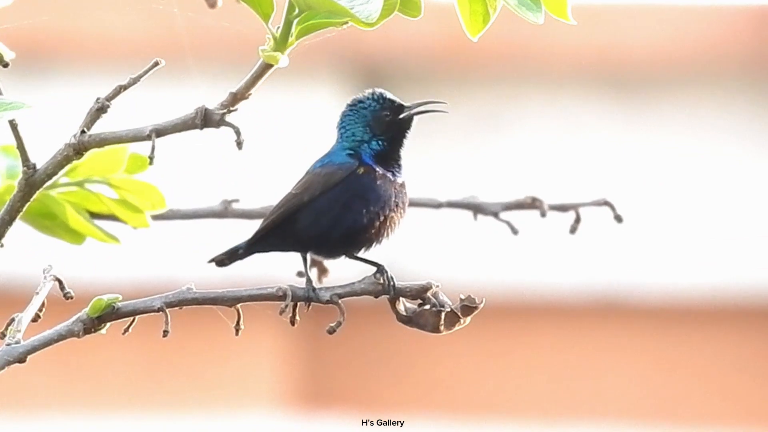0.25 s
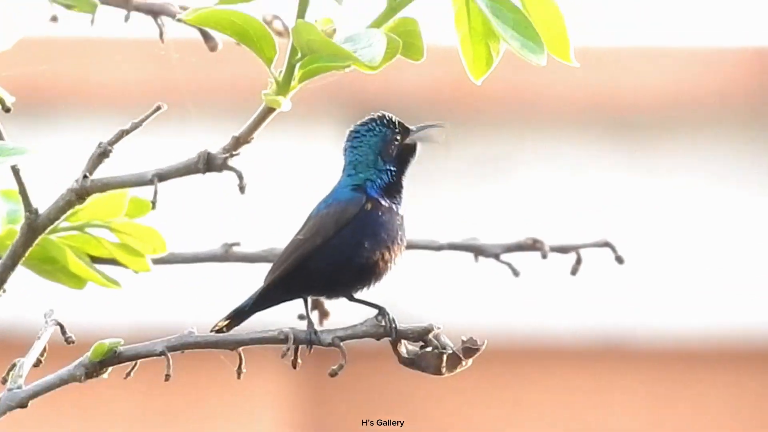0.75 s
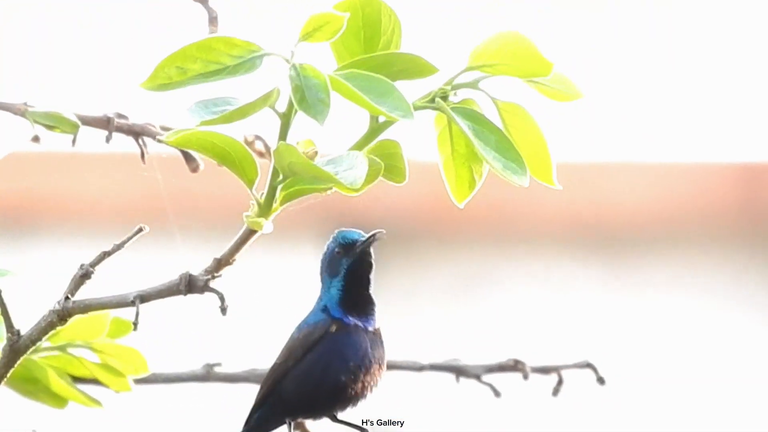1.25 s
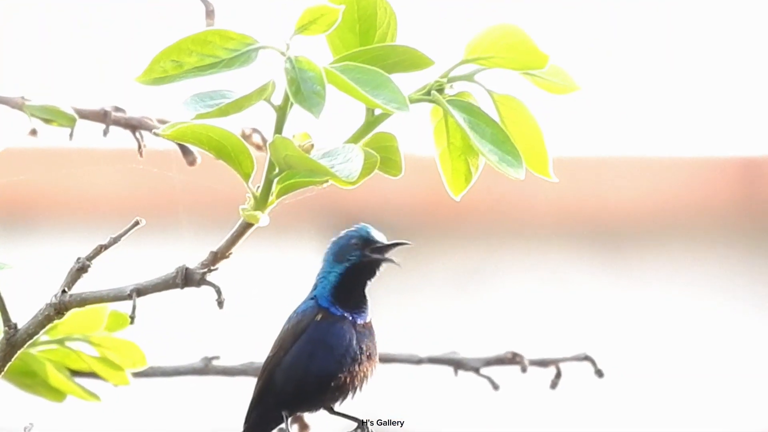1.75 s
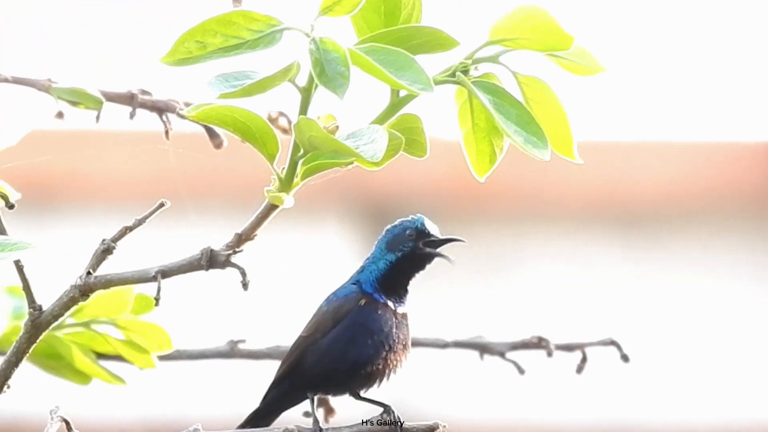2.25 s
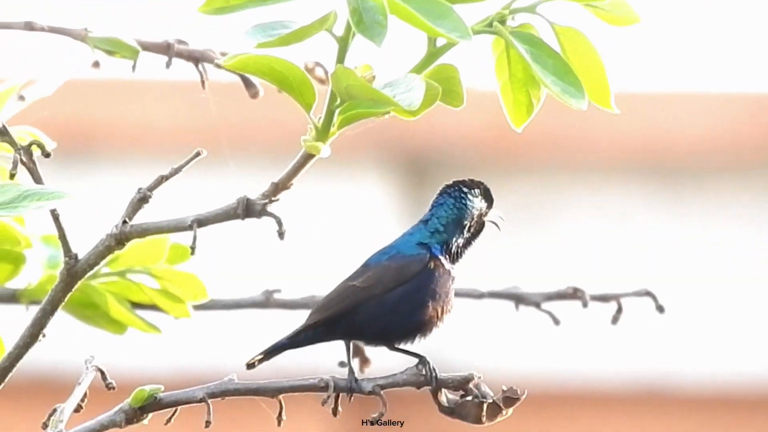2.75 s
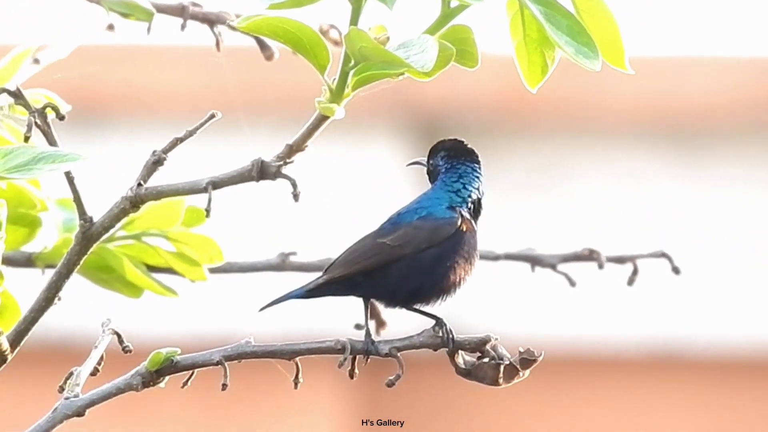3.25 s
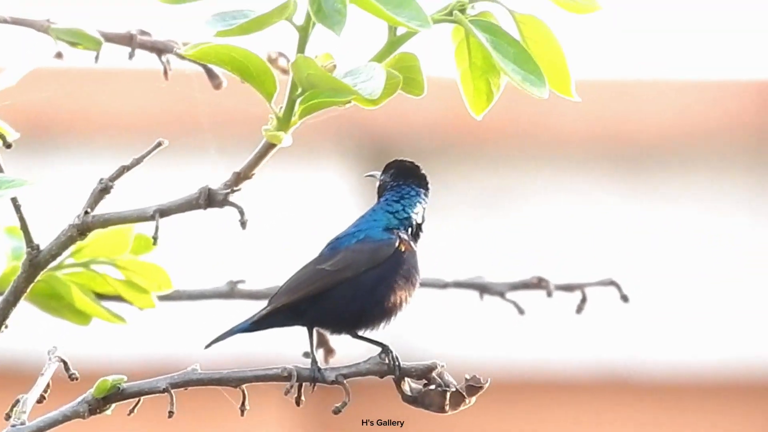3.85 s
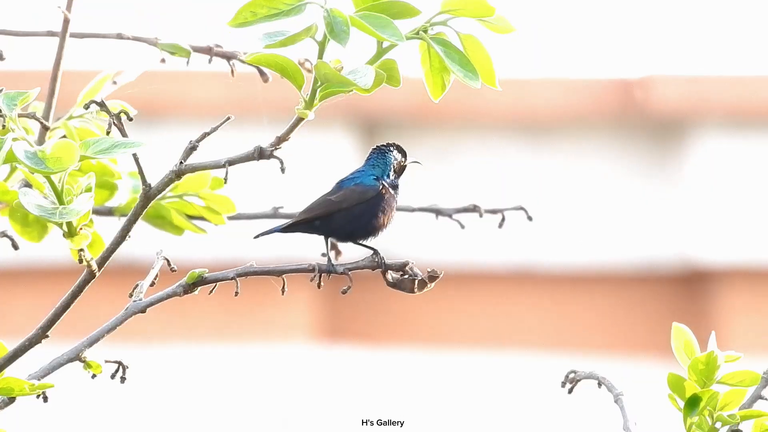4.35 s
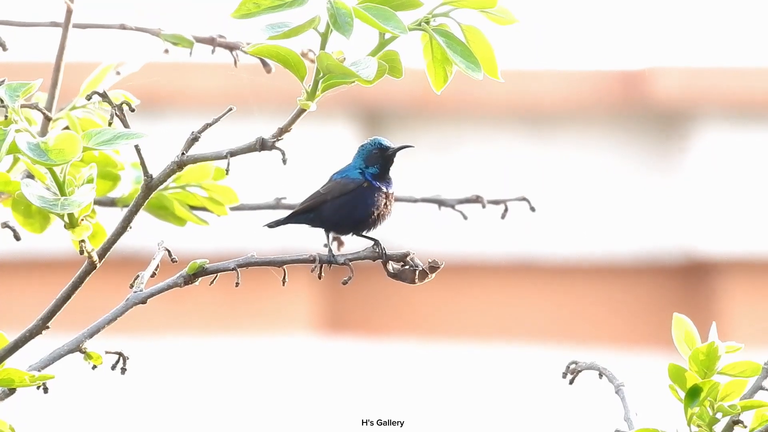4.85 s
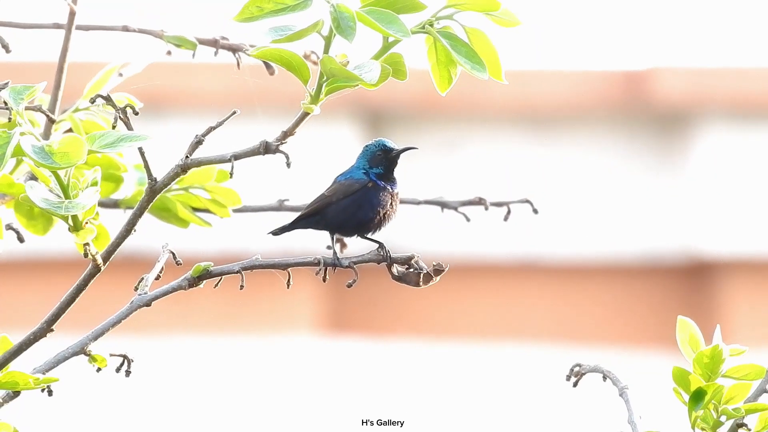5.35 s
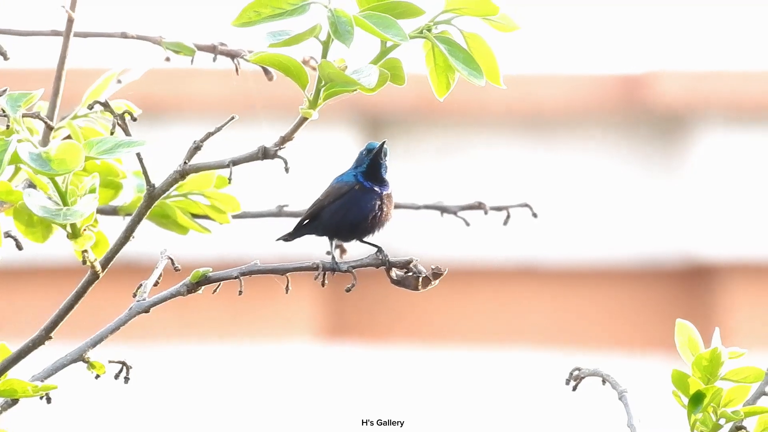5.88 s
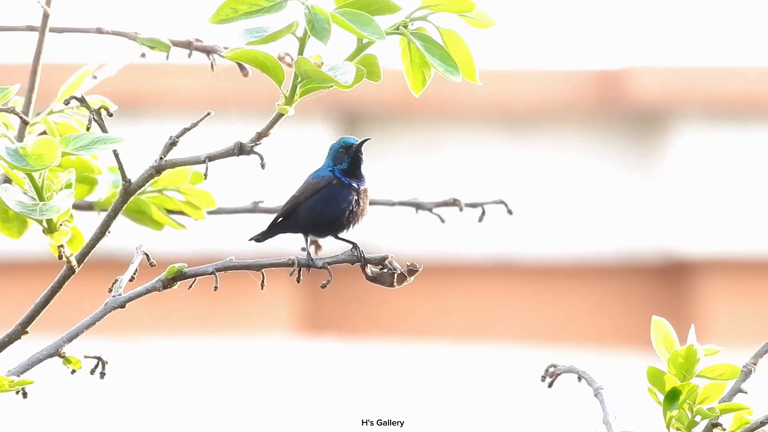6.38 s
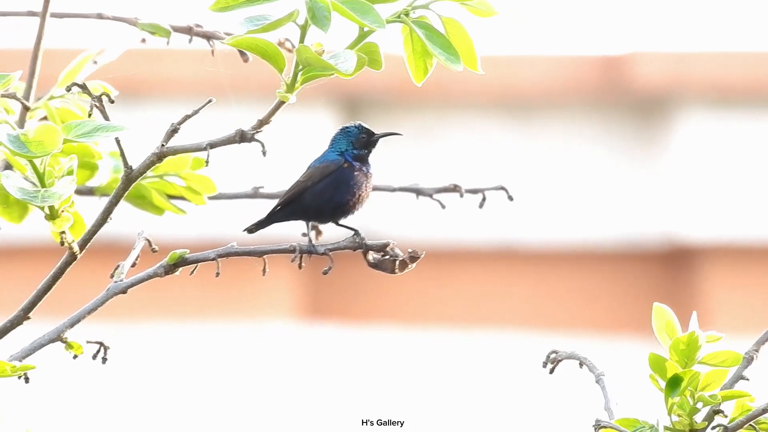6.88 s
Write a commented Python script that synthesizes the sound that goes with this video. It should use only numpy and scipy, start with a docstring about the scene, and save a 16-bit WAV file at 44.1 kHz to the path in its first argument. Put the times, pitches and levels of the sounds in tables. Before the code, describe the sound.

A small sunbird sings two rapid, sharp, high-pitched twittering runs with soft ticks between, echoing off house walls over faint town hum and hiss.

```python
"""In front of a house, over a low town hum and a faint hiss: a sunbird sings two runs with soft high ticks between.
Whistles are gliding sines that turn to noisy warble on fast slides and low notes; rasps are two jittering tones;
ticks are tiny downward slides. Random wall echoes, a diffuse tail and narrow resonances return the song.
Far birds waver in the echoes; hum, traffic and hiss are shaped noise. The level dips briefly once."""
import sys
import numpy as np
from scipy import signal
from scipy.fft import rfft, irfft, next_fast_len
from scipy.io import wavfile
from scipy.ndimage import uniform_filter1d, minimum_filter1d, map_coordinates

SR = 44100
rng = np.random.default_rng(int(sys.argv[2]) if len(sys.argv) > 2 else 0)


def wav_out(sig):
    """Save sig, one row per channel (or a flat mono array), as 16-bit PCM at SR to the path in sys.argv[1]."""
    wavfile.write(sys.argv[1], SR, np.round(np.clip(np.atleast_2d(sig).T, -1, 1) * 32767).astype(np.int16))


N = 313992


def amp(db):
    """Amplitude ratio from dB."""
    return 10 ** (np.asarray(db) / 20)


def unit(x):
    """Scale to rms 1."""
    return x / np.sqrt(np.mean(x ** 2) + 1e-20)


def along(points, hz):
    """Interpolate (Hz, value) points on a log frequency axis."""
    f, v = np.transpose(points)
    return np.interp(np.log(hz + 1), np.log(f + 1), v)


def over_time(points):
    """Interpolate (s, value) points over the whole scene."""
    return np.interp(np.arange(N) / SR, *np.transpose(points))


def wobble(rate_hz, size):
    """Smooth random curve through normal knots, rate_hz knots a second, size samples long."""
    knots = rng.standard_normal(int(size * rate_hz / SR) + 4)
    return map_coordinates(knots, [np.arange(size) * rate_hz / SR])


def filtered(x, response):
    """Multiply the spectrum by a complex response of frequency."""
    m = next_fast_len(N + SR // 2)
    return irfft(rfft(x, m) * response(np.fft.rfftfreq(m, 1 / SR)), m)[..., :N]


def add(track, start_s, sound):
    """Mix a sound into the track from start_s."""
    room = track[max(round(start_s * SR), 0):][:len(sound)]
    room += sound[:len(room)]


def pair(two, hz):
    """Mix two unrelated spectra into the partly alike signals of two close microphones."""
    # left-right correlation: f/Hz, correlation
    likeness = [(60, 0.89), (1000, 0.96), (3000, 0.8), (6000, 0.21), (12000, .4)]
    turn = np.arccos(np.clip(along(likeness, hz), -1, 1)) / 2
    mid, side = two[0] * np.cos(turn), two[1] * np.sin(turn)
    return np.array([mid + side, mid - side])


def rush(spectrum):
    """Stereo Gaussian noise of rms 1, shaped by (Hz, dB) points."""
    hz = np.fft.rfftfreq(N, 1 / SR)
    noise = pair(rfft(rng.standard_normal((2, N))), hz)
    return unit(irfft(noise * amp(along(spectrum, hz)), N))


def background():
    """Three shaped noises: wavering town hum, far traffic that swells a little, slightly wavering hiss."""
    # noise spectra: f/Hz, relative density/dB
    hum_spectrum = [(20, -32.5), (40, -16.5), (62, -1.5), (130, -1.5), (170, -2.5), (250, -16.5),
                    (300, -13), (400, -28.5), (900, -54)]
    traffic_spectrum = [(160, -29), (280, -5), (486, 0.5), (635, 8.5), (748, 7.5), (859, 1), (1090, 6),
                        (1310, 1), (2200, -6), (2860, -55.5), (4840, -120)]
    air_spectrum = [(200, -22), (350, -7.5), (670, -17.5), (1400, -11.5), (2100, -9.5), (3400, -5),
                    (4300, -6), (6200, -5), (7000, -9.5), (8200, -24), (10000, -36.5), (15500, -35)]
    # far traffic: t/s, relative level/dB
    traffic_level = [(0, -48), (1.3, -49.5), (2, -48), (3.35, -49), (3.5, -42.5), (3.8, -45.5), (4, -41.5),
                     (4.15, -47), (5.602, -46), (7.12, -48)]
    hum = amp(-45.5 + 0.79 * wobble(6.5, N)) * rush(hum_spectrum)
    swell = amp(1.5 * wobble(14, N))
    traffic = amp(over_time(traffic_level) - 3.5) * swell * rush(traffic_spectrum)
    hiss = amp(-41.5 + 0.5 * wobble(11, N)) * rush(air_spectrum)
    return hum + traffic + hiss


def syrinx(hz, overtone_db=-56):
    """Nearly pure tone of rms about 1 with a trace of its octave."""
    phase = 2 * np.pi * np.cumsum(hz) / SR
    return np.sqrt(2) * (np.sin(phase) + amp(overtone_db) * np.sin(2 * phase))


def warble(hz, swing, rate_hz, flutter_db):
    """Tone of rms 1 with random jitter of pitch (at rate_hz) and strength (at half of it)."""
    tone = syrinx(hz * (1 + swing * wobble(rate_hz, len(hz))))
    return unit(tone * amp(flutter_db * wobble(rate_hz / 2, len(hz))))


def far_birds(swing=.13):
    """Wavering calls of distant birds, each swelling and fading."""
    # t/s, length/s, mean f/Hz, relative level/dB
    calls = [(.07, 0.087, 2225, -42.5), (1.152, .14, 2730, -44), (1.545, .15, 3400, -38.5),
             (1.821, 0.068, 2950, -34), (1.901, 0.15, 2980, -42.5), (2.05, .07, 3550, -32),
             (2.582, 0.091, 2710, -38.5), (2.776, 0.1, 2480, -39.5), (5.619, 0.18, 2456, -43),
             (5.932, 0.11, 2090, -43.5)]
    out = np.zeros(N)
    for start_s, length_s, hz, db in calls:
        swell = np.hanning(int(length_s * SR)) ** .5
        tone = warble(np.full(len(swell), hz), swing, rate_hz=140, flutter_db=4.5)
        add(out, start_s, amp(db) * swell * tone)
    return out


def gesture(note, fade_s):
    """Turn (s, Hz, dB) points into start time, smoothed pitch and loudness eased in and out."""
    s, hz, db = np.transpose(note)
    s = np.sort(s)
    t = np.arange(s[0] - fade_s / 2, s[-1] + fade_s / 2, 1 / SR)
    to_edge_s = np.minimum(t - t[0], t[-1] - t)
    gate = np.sin(np.pi / 2 * np.clip(to_edge_s / fade_s, 0, 1)) ** 2
    pitch = uniform_filter1d(np.interp(t, s, hz), size=180)
    return t[0], pitch, gate * amp(np.interp(t, s, db))


def throat(x):
    """Throat and bill pass mainly the middle band of a harsh sound."""
    # f/Hz, gain/dB
    colour = [(2500, -9), (3500, 1), (4300, 2), (7000, -2.5), (7700, -5), (8600, -22), (11000, -36.5)]
    return filtered(x, lambda hz: amp(along(colour, hz)))


def rasp(start_s, length_s, from_hz, to_hz, db, swelling):
    """Points of a harsh note that swells and fades while its pitch settles exponentially."""
    onset_db, end_db, settle_share = -16, -6, 0.3
    u = np.linspace(0, 1, num=24)
    peak = np.clip(swelling, .05, .95)
    swell_db = np.interp(u, [0, peak, 1], [onset_db, 0, end_db])
    hz = to_hz + (from_hz - to_hz) * np.exp(-u / settle_share)
    return np.column_stack([start_s + length_s * u, hz, db + swell_db])


def rasps(under_db=-9, under_ratio=.8):
    """Chaotic membranes as jittering tones; the second side of the syrinx adds a lower band."""
    # t/s, length/s, start f/Hz, settling f/Hz, relative peak level/dB, swelling share of length
    harsh_notes = [(0.214, .048, 5700, 5500, -31.5, 0.98), (0.375, .047, 6500, 5420, -32, 0.44),
                   (0.601, .04, 6200, 7220, -29, .9), (0.863, 0.073, 7500, 6100, -14, 0.77),
                   (1.095, 0.091, 7200, 5600, -21.5, 0.11), (1.442, .08, 5600, 6440, -17, 0.37),
                   (1.62, 0.021, 7020, 7450, -15.5, 0.3), (1.646, .043, 6320, 6140, -20.5, 0.43),
                   (1.943, 0.027, 6340, 5900, -13, 0.31), (4.438, .063, 7120, 6154, -17, 0.66),
                   (4.804, 0.07, 7200, 6210, -18.5, 0.96), (5.121, .069, 7150, 5850, -20, .4),
                   (5.412, 0.049, 7150, 5800, -22, 0.27)]
    out = np.zeros(N)
    for row in harsh_notes:
        start_s, hz, loud = gesture(rasp(*row), fade_s=0.014)
        upper = warble(hz, swing=.055, rate_hz=1300, flutter_db=3)
        lower = warble(hz * under_ratio, swing=.05, rate_hz=1200, flutter_db=3)
        add(out, start_s, loud * (upper + amp(under_db) * lower))
    return throat(out)


def rise(start_s, length_s, from_hz, to_hz, db, bend=1, ripple_hz=0, swell_db=0):
    """Points of a whistle that slides between two pitches, rising or falling."""
    u = np.linspace(0, 1, num=24)
    hz = from_hz + (to_hz - from_hz) * u ** bend + ripple_hz * np.sin(2 * np.pi * u)
    return np.column_stack([start_s + length_s * u, hz, db + swell_db * (u - .5)])


def eased_in(note, onset_db=-8, onset_share=0.18):
    """The same note with a soft start that decays over a share of its length."""
    s, hz, db = np.transpose(note)
    u = np.linspace(0, 1, num=len(s))
    return np.column_stack([s, hz, db + onset_db * np.exp(-u / onset_share)])


def arch(start_s, length_s, start_hz, top_hz, end_hz, rising, db, fade_db, roundness=1.6):
    """Points of a chip that shoots up and curves down again."""
    u, crest = np.linspace(0, 1, num=40), np.clip(rising, .01, .99)
    sag = np.interp(u, [0, crest, 1], [1, 0, 1]) ** roundness
    foot_hz = np.where(u < crest, start_hz, end_hz)
    hz = top_hz + (foot_hz - top_hz) * sag
    return np.column_stack([start_s + length_s * u, hz, db + fade_db * u])


def swoop(leap_at_s, low_s, high_s, start_hz, foot_hz, top_hz, low_db, high_db, leap_s):
    """Points of a whistle that starts soft, creeps along a low shelf, leaps and holds its top."""
    shelf_bend, onset_db, onset_s = 1.6, -4, 0.017
    t = np.linspace(-low_s, high_s, num=60)
    shelf = start_hz + (foot_hz - start_hz) * np.clip(1 + t / low_s, 0, 1) ** shelf_bend
    leap = (1 + np.tanh(t / leap_s)) / 2
    hz = shelf + (top_hz - shelf) * leap
    soft_db = onset_db * np.exp(-(t + low_s) / onset_s)
    return np.column_stack([leap_at_s + t, hz, low_db + (high_db - low_db) * leap + soft_db])


def motif(s, db, lead_s, blip_db, sigh_db):
    """Points of a low blip, a two-voiced hook and a sinking sigh."""
    # blip: t/s from its own start, f/Hz, relative level/dB
    blip = [(0.0, 4760, -23), (0.016, 4183, -9.5), (0.024, 3340.0, -14.5)]
    # hook, its second voice from the other side of the syrinx, sigh: t/s from motif, f/Hz, relative level/dB
    hook = [(-0.038, 6780.0, -28), (-0.023, 7240.0, -18.5), (-0.015, 7450.0, -18), (-0.009, 6850.0, -10),
            (0.005, 5040.0, -20), (0.021, 3980.0, -16.5)]
    under_hook = [(-0.032, 4507, -25), (-0.02, 6430, -15.5)]
    sigh = [(0.027, 5670, -15), (0.037, 5516, -17), (0.06, 5330.0, -30)]
    return [np.add(blip, (s - lead_s, 0, blip_db)), np.add(hook, (s, 0, db)),
            np.add(under_hook, (s, 0, db)), np.add(sigh, (s, 0, sigh_db))]


def pure_notes():
    """All whistled notes; the two sides of the syrinx may overlap."""
    # rising whistles: t/s, length/s, start f/Hz, end f/Hz, relative level/dB,
    # bend (<1 early rise, >1 late), S-shaped ripple/Hz, level change/dB
    rising_whistles = [(0.431, 0.114, 3360, 5880, -24, 0.55, 129, 6),
                       (0.616, 0.049, 5200, 6060, -28.0, 0.67, 3, 5),
                       (0.663, 0.104, 3130, 5910, -19.5, 0.85, 251, -7.5),
                       (0.92, 0.103, 3220, 5420, -18, 0.95, 41, -2.5),
                       (1.125, 0.1, 3135, 5360, -16, 1.1, -100.0, -2.5),
                       (1.189, 0.118, 3372, 5468, -9, 1.3, 153.5, -1.5),
                       (1.7, 0.018, 5130, 6630, -16.5, 1.1, 147, 2.5),
                       (2.522, 0.086, 3526, 4746, -12.5, 1.8, 48, -7.5),
                       (2.698, 0.079, 3390, 4307, -12, 0.74, 104.5, -17.5),
                       (2.903, 0.065, 3200, 4216, -12.5, 0.83, -49.5, -10.5),
                       (4.858, 0.04, 3595, 4220.0, -20.5, 2.8, -50.0, -6.0),
                       (4.903, 0.096, 4420, 5770, -12, 1.5, 54.5, -11),
                       (5.161, 0.046, 3290, 4470, -20, 0.65, -50.0, -4)]
    # falling chips: t/s, length/s, start f/Hz, end f/Hz, relative level/dB
    falling_chips = [(1.771, 0.012, 7970, 6500, -10), (1.909, 0.0067, 7520, 7160, -6.5),
                     (2.079, 0.014, 6830, 5730, -12.5), (2.209, 0.016, 6740.0, 5930, -14.5),
                     (2.333, 0.032, 6040, 5130, -18.5), (2.408, 0.018, 8340, 8080, -15.5),
                     (2.517, 0.015, 6640.0, 5290, -12), (2.609, 0.03, 8230, 7600, -15.5),
                     (2.72, 0.028, 6300.0, 5310, -18.5), (2.81, 0.014, 8430, 8350, -19.5),
                     (2.933, 0.018, 6590.0, 5010, -19.5)]
    # swoops: leap t/s, low shelf/s, high shelf/s, start f/Hz, leap foot f/Hz, top f/Hz,
    # low relative level/dB, high relative level/dB, leap time constant/s
    leaping_whistles = [(1.567, 0.071, 0.056, 4904, 4870, 6170, -13, -15, 0.013),
                        (1.796, 0.062, 0.054, 4723, 5390, 6380.0, -12.5, -15.5, 0.014),
                        (2.007, 0.071, 0.029, 4396, 5007, 6920, -12, -13.5, 0.006),
                        (2.146, 0.046, 0.034, 4680, 4720, 6785, -15.0, -11, 0.009),
                        (2.287, 0.033, 0.025, 4220, 4575, 6244, -8, -9.5, 0.0046),
                        (2.441, 0.061, 0.038, 3920, 5170, 6366, -9, -15.0, 0.0045),
                        (5.258, 0.049, 0.054, 4487, 5310, 6200, -13.5, -16, 0.0093),
                        (5.525, 0.062, 0.046, 4744, 5150, 6575, -13.5, -13.5, 0.015),
                        (5.782, 0.059, 0.051, 4836, 5540, 6220, -15, -14.0, 0.014),
                        (6.025, 0.059, 0.024, 3970.0, 4830, 6225, -12.0, -11.0, 0.0036),
                        (6.304, 0.089, 0.04, 3370.0, 4510, 6950, -11.0, -13.5, 0.012),
                        (6.567, 0.092, 0.024, 3313, 4735, 6670, -9.0, -11.5, 0.012),
                        (6.832, 0.09, 0.042, 3284, 4590, 6810, -8.5, -16, 0.012),
                        (7.014, 0.035, 0.046, 4510, 4550, 6720, -8.5, -17.5, 0.011)]
    # arched chips: t/s, length/s, start f/Hz, top f/Hz, end f/Hz, rising share of length,
    # relative level/dB, level change by the end/dB
    arched_chips = [(1.34, 0.039, 6330, 8170, 5400, 0.35, -20.5, 8),
                    (2.61, 0.061, 5600, 6930, 4070, 0.1, -8.5, -11),
                    (2.781, 0.076, 5820, 7070, 3615, 0.17, -9, -11.5),
                    (2.977, 0.054, 5840, 7080, 4570, 0.32, -6, -14.5)]
    # second-run motifs: t/s, hook gain/dB, blip lead/s, blip gain/dB, sigh gain/dB
    motif_times = [(5.706, 2.5, 0.063, 2.5, -1), (5.955, 1.0, 0.07, 4, -0.5), (6.216, 0.5, 0.072, 2.5, 0),
                   (6.472, 1, 0.074, 2, 3), (6.733, -1.5, 0.076, 0.5, 4.5), (6.997, -3.5, 0.077, 1, -1.5)]
    notes = [eased_in(rise(*row)) for row in rising_whistles]
    notes += [rise(*row) for row in falling_chips]
    notes += [swoop(*row) for row in leaping_whistles]
    notes += [arch(*row) for row in arched_chips]
    return notes + [note for row in motif_times for note in motif(*row)]


def whistles():
    """Trembling tones along the gestures, hoarse on fast slides and at the bottom of the range."""
    # strength over the singing range: f/Hz, gain/dB
    voice_range = [(3100.0, -12.5), (3800.0, -15.5), (4250.0, -7.5), (4600.0, -0.5), (6500.0, 0),
                   (7000.0, -5), (7500.0, -11.5), (8400.0, -13.5)]
    hoarse_db, hoarse_growth_db, tremor_db = -14.5, 10.5, 2.5
    clear, hoarse = np.zeros((2, N))
    for note in pure_notes():
        start_s, hz, loud = gesture(note, fade_s=0.0034)
        loud = loud * amp(along(voice_range, hz))
        slide = np.clip(np.abs(np.gradient(hz)) * SR / 60000, 0, 1)  # 1 from 60 kHz/s
        slack = np.clip((4500 - hz) / 600, 0, 1)
        share = np.minimum(amp(hoarse_db + hoarse_growth_db * np.maximum(slide, slack)), .9)
        tremor = unit(amp((tremor_db + 1.5 * slide) * wobble(260, len(hz))))
        clear_tone = warble(hz, swing=.012, rate_hz=400, flutter_db=2)
        hoarse_tone = warble(hz, swing=.065, rate_hz=900, flutter_db=3)
        add(clear, start_s, loud * tremor * np.sqrt(1 - share ** 2) * clear_tone)
        add(hoarse, start_s, loud * share * hoarse_tone)
    return clear + throat(hoarse)


def ticks(centre_hz=6270, fall_hz=230, width_s=0.0044):
    """Tiny downward slides under Gaussian envelopes, each slightly off in pitch."""
    # t/s, relative peak level/dB
    soft_ticks = [(3.297, -30.5), (3.376, -26.5), (3.446, -28.5), (3.513, -30.5), (3.585, -33),
                  (3.664, -33.5), (3.741, -32), (3.817, -32), (3.897, -31.5), (3.969, -30.5), (4.034, -30),
                  (4.106, -29), (4.19, -26), (4.314, -30)]
    out, t = np.zeros(N), np.arange(-SR // 50, SR // 50) / SR
    for s, db in soft_ticks:
        hz = centre_hz - fall_hz * np.tanh(t / (2 * width_s)) + rng.normal(0, 32.0)
        add(out, s + t[0], amp(db + 2.5) * np.exp(-(t / width_s) ** 2) * syrinx(hz))
    return out


def yard(near_db=-1.5, near_decay_s=0.024, tail_db=-5.0, build_s=0.009):
    """Stereo impulse response: sparse wall echoes, then a diffuse tail from house and trees."""
    # f/Hz, t60/s
    decay = [(2500, 0.57), (5000, 0.59), (7000, 0.49), (8500, 0.39)]
    hz, t, z = signal.stft(rng.standard_normal((2, SR // 2)), SR, nperseg=256)
    fading = amp(-60 * t / along(decay, hz)[:, None]) * (1 - np.exp(-t / build_s))
    tail = signal.istft(z * fading, SR, nperseg=256)[1][:, :SR // 2]
    tail = tail / np.linalg.norm(tail[0])
    walls = np.zeros_like(tail)
    delay_s = np.linspace(.004, .06, num=14) + rng.uniform(-.002, .002, size=14)
    strength = rng.standard_normal((2, len(delay_s))) * np.exp(-delay_s / near_decay_s)
    walls[:, (delay_s * SR).astype(int)] = strength
    walls = walls / np.linalg.norm(walls, axis=1, keepdims=True)
    echoes = amp(tail_db) * tail + amp(near_db) * walls
    return irfft(pair(rfft(echoes), np.fft.rfftfreq(SR // 2, 1 / SR)))


def echoed(x, size=SR // 2):
    """Crossfade to a fresh random yard response every 0.25 s, as the bird turns its head."""
    out, padded = np.zeros((2, N + 2 * SR)), np.pad(x, size)
    window = np.sqrt(np.hanning(size))
    for i in range(size // 2, N + size, size // 2):
        answer = yard()
        piece = signal.fftconvolve((padded[i:i + size] * window)[None], answer, axes=1)
        out[:, i:i + piece.shape[1]] += piece
    return out[:, size:size + N]


def ringing(hz, ring_db=-3, width_hz=21.2):
    """Response with narrow resonances at the pitches where wall echoes add up."""
    # f/Hz
    centres = [4423, 4547, 4786, 4931, 5328, 5379, 5545, 5869, 5992, 6094, 6195, 6360, 6595, 6750, 6848]
    rings = sum(1j * hz * width_hz / (c * c - hz * hz + 1j * hz * width_hz) for c in centres)
    return 1 + amp(ring_db) * rings


def bird(lag_samples=1.906, direct_db=-2.0, fizz_db=-35):
    """Song, ticks and echoes reach the right microphone just before the left."""
    # direct song as the bird turns its head: t/s, gain/dB
    head_turn = [(0.5, 1), (1.5, -1.5), (2.3, -3.5), (2.8, -5), (4.5, 2.5), (5.4, -1), (5.9, -5), (6.9, -2)]
    # left minus right: f/Hz, level difference/dB
    balance = [(1500, 0.5), (2800, -1.5), (3600, -5), (4600, -1), (8000, -1)]
    song = amp(0.45) * whistles() + amp(1.94) * rasps()
    soft = ticks()
    # a faint high fizz rides on the loudest notes
    power = np.abs(uniform_filter1d(song ** 2, size=1800))
    fizz = amp(fizz_db) * power * rush([(6000, -42.0), (9000, -11), (14000, -8.5)])
    # the soft ticks stir the yard less than the full song; far birds are heard only through it
    echoes = echoed(song + amp(-2.0) * soft + amp(2) * far_birds())
    direct = amp(over_time(head_turn)) * song + amp(1.0) * soft
    heard = amp(direct_db) * filtered(direct + echoes, ringing) + fizz
    side = np.array([[.5], [-.5]])  # left, right

    def microphones(hz):
        delay = np.exp(-2j * np.pi * hz * side * lag_samples / SR)
        return amp(side * along(balance, hz)) * delay
    return filtered(heard, microphones)


def scene():
    """Bird song and its echoes over the background."""
    return bird() + background()


def record(dry, ceiling=.85, top_hz=15600):
    """One brief level dip, a limiter that turns down the highest peaks, a sharp upper band limit."""
    # t/s, half width/s
    brief_dip = (4.236, .005)
    dip_s, half_width_s = brief_dip
    dip = 1 - .9 * np.exp(-((np.arange(N) / SR - dip_s) / half_width_s) ** 4)
    needed = np.minimum(1, ceiling / (np.abs(dry).max(axis=0) + 1e-9))
    gain = uniform_filter1d(minimum_filter1d(needed, size=130), size=130)
    return filtered(dry * dip * gain, lambda hz: hz < top_hz)


dry = scene()
out = record(dry)
wav_out(out)
```